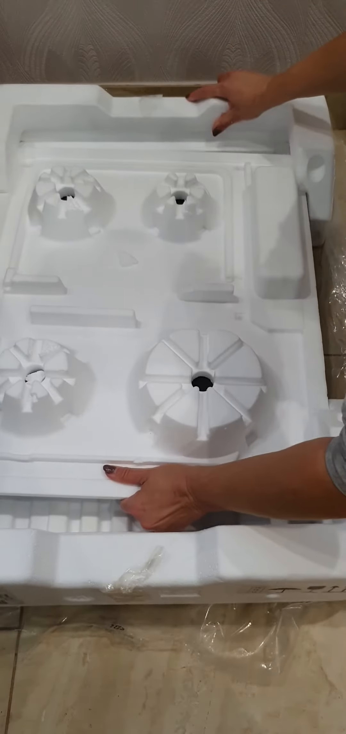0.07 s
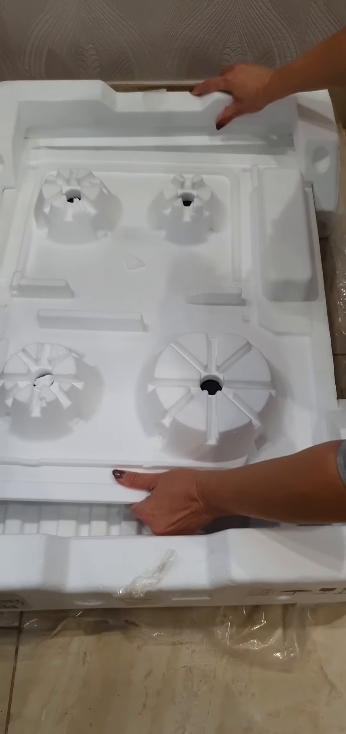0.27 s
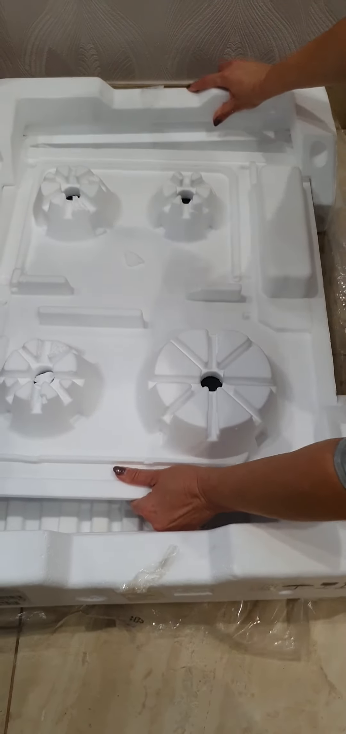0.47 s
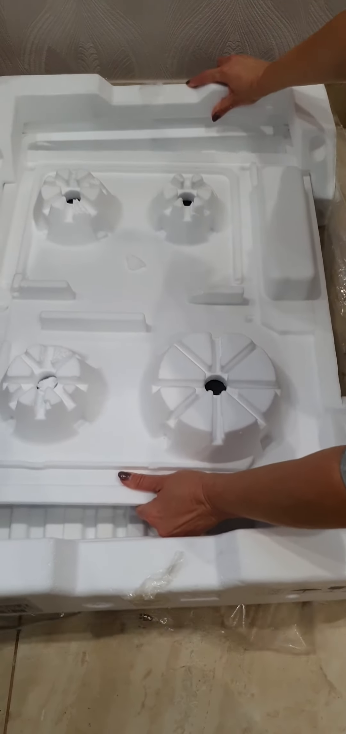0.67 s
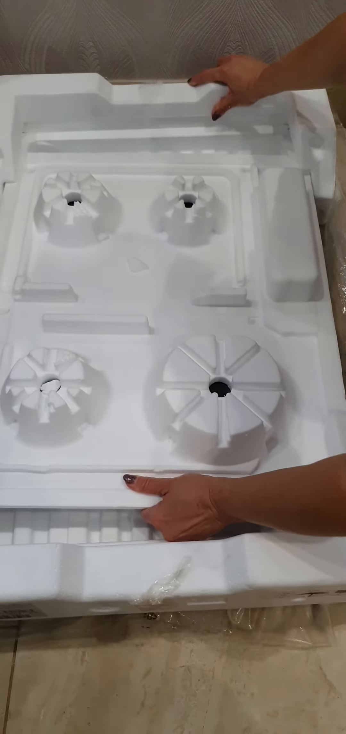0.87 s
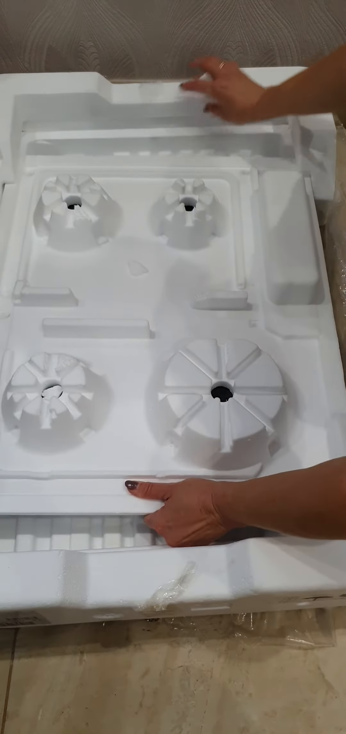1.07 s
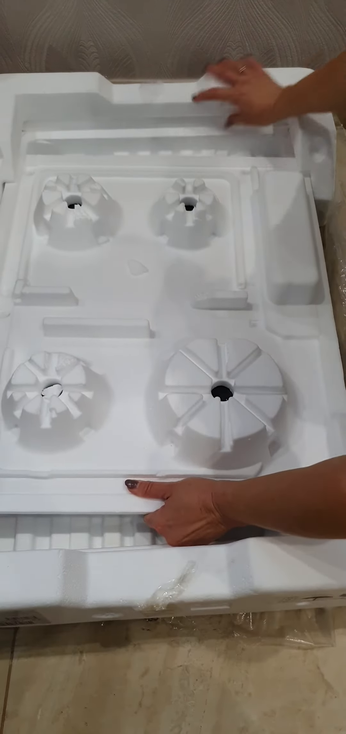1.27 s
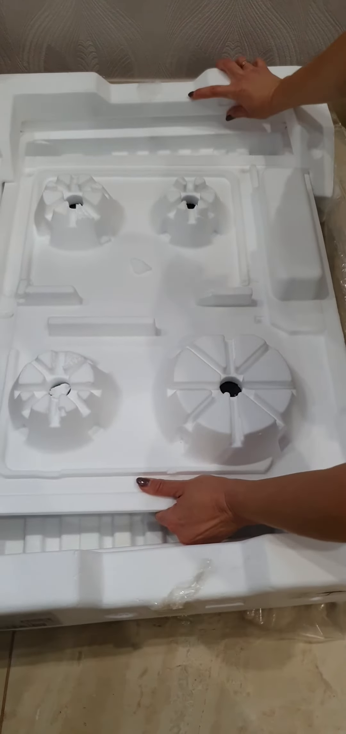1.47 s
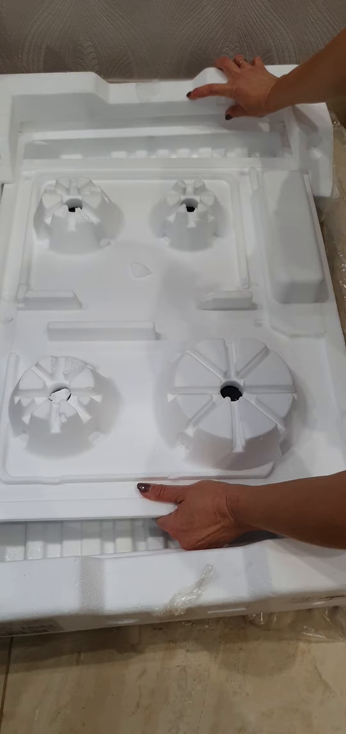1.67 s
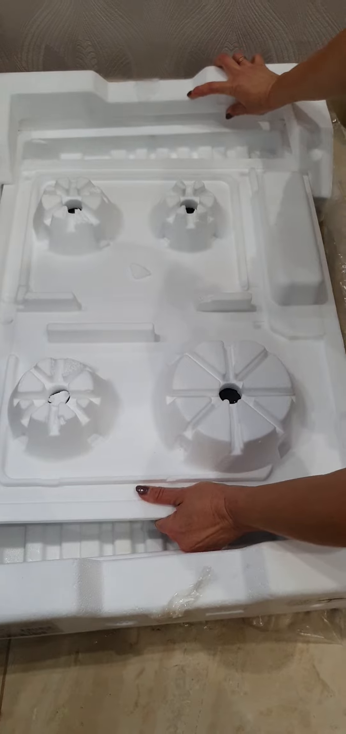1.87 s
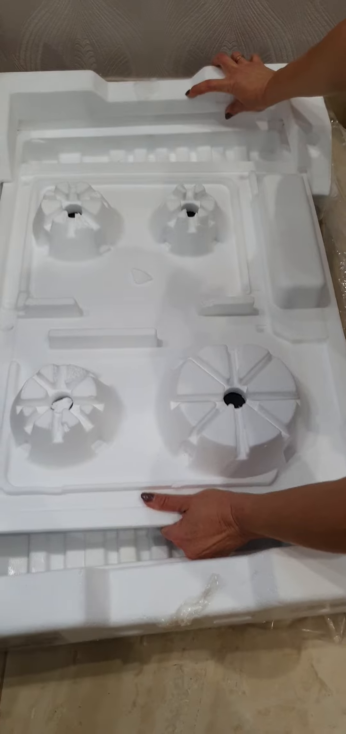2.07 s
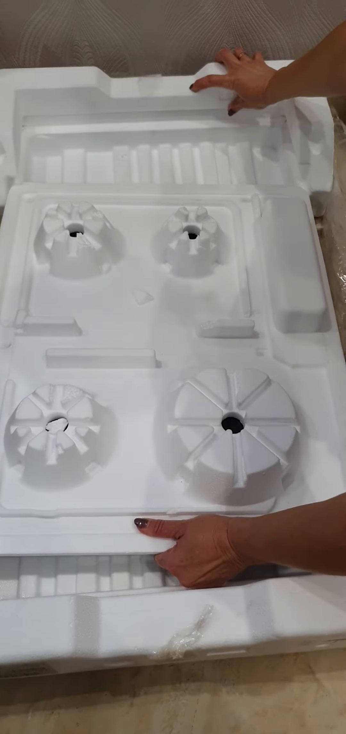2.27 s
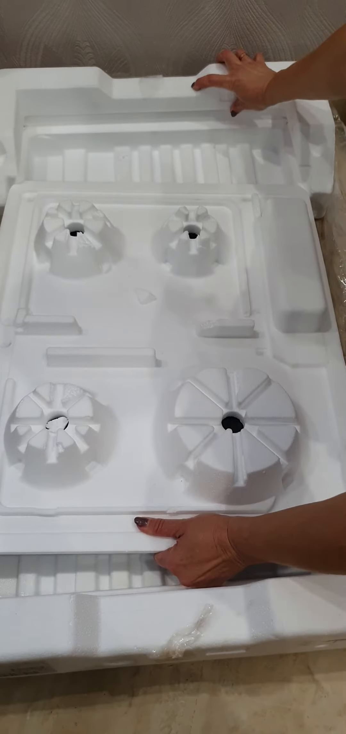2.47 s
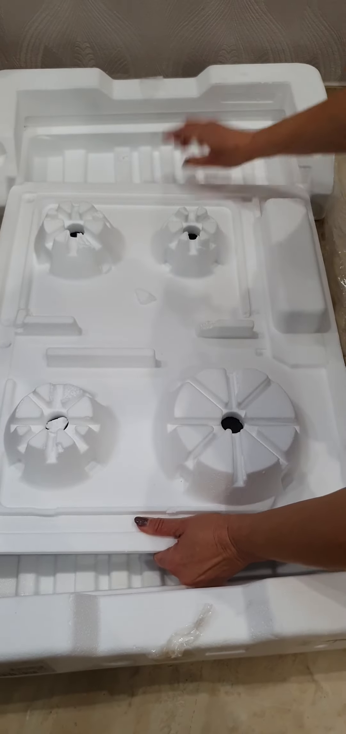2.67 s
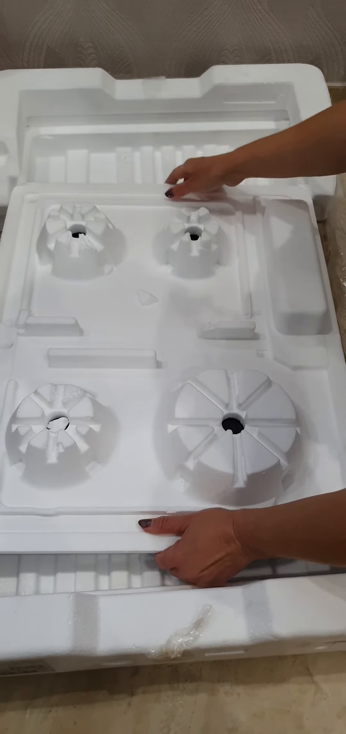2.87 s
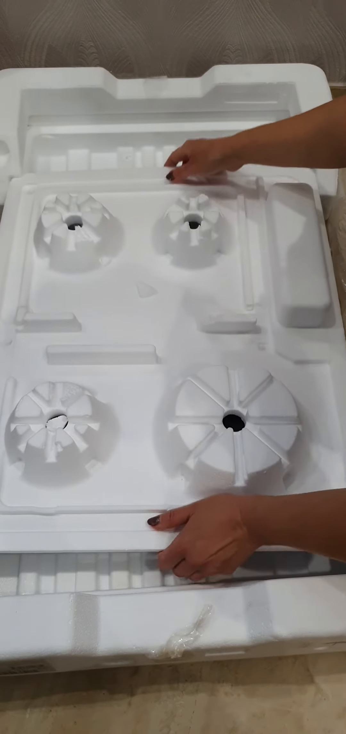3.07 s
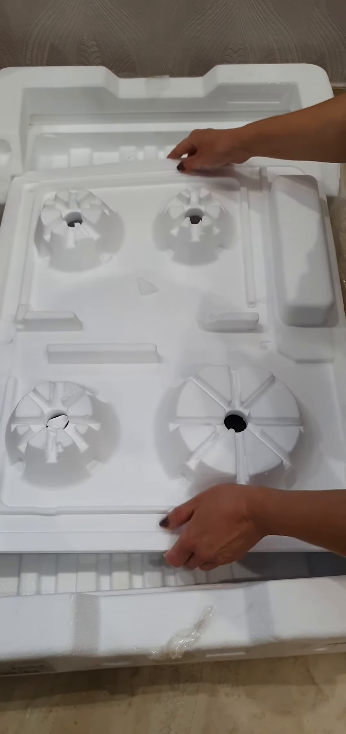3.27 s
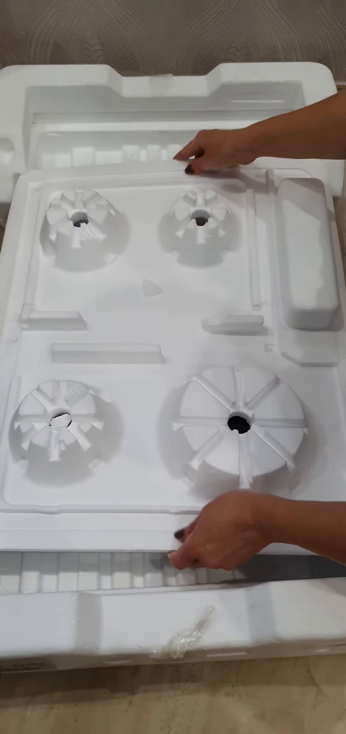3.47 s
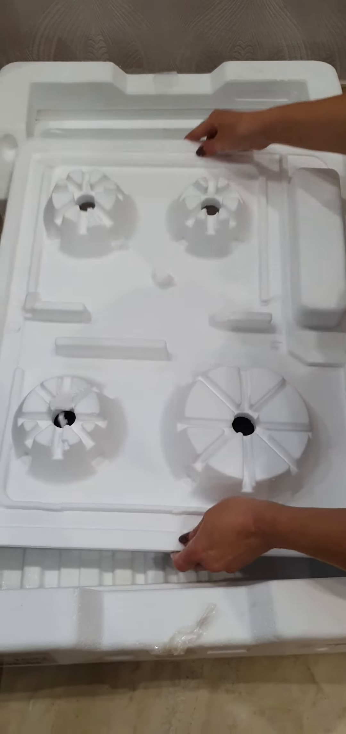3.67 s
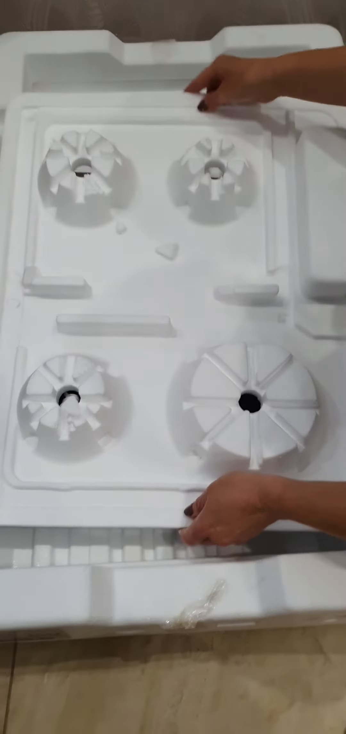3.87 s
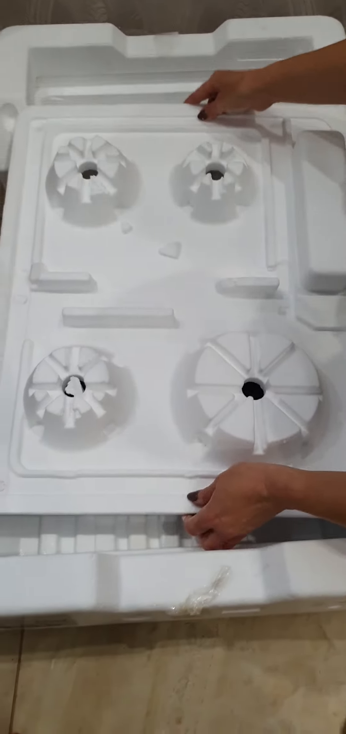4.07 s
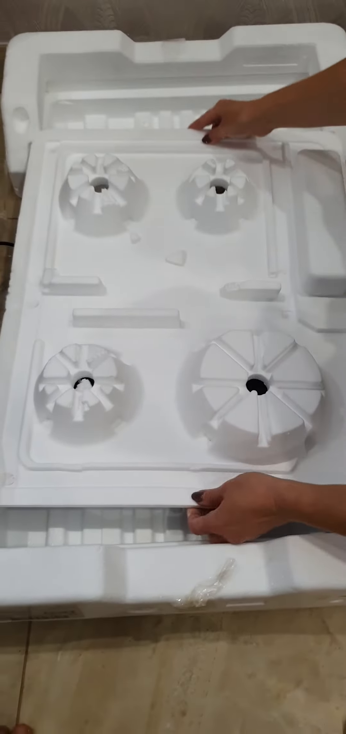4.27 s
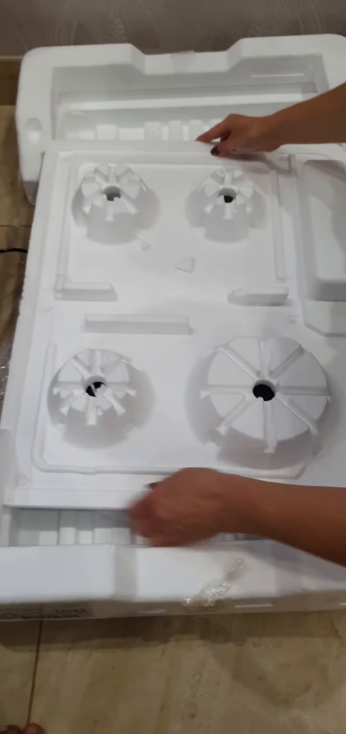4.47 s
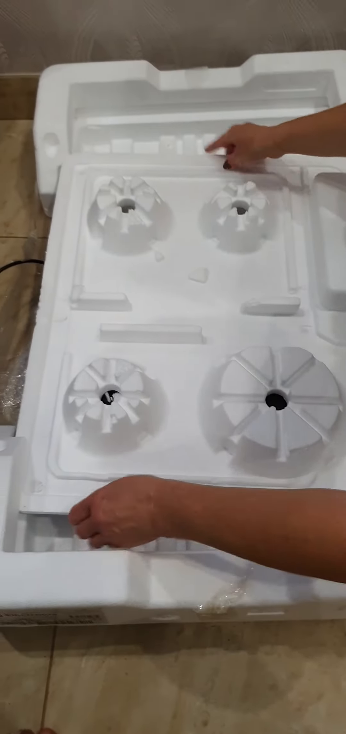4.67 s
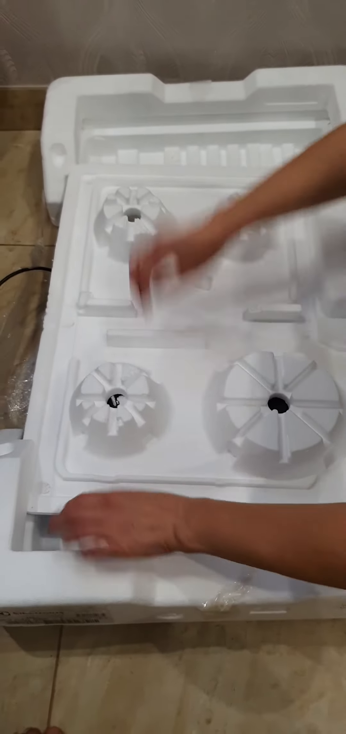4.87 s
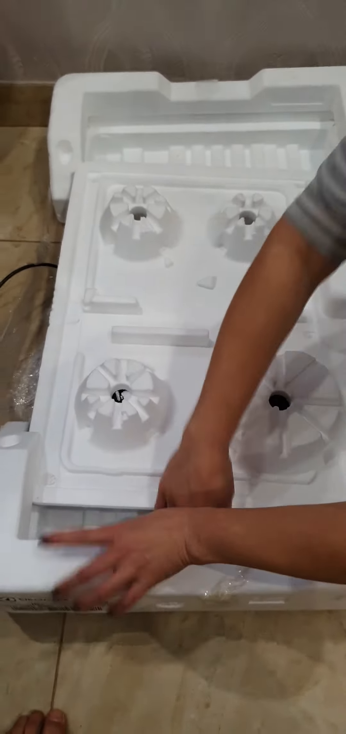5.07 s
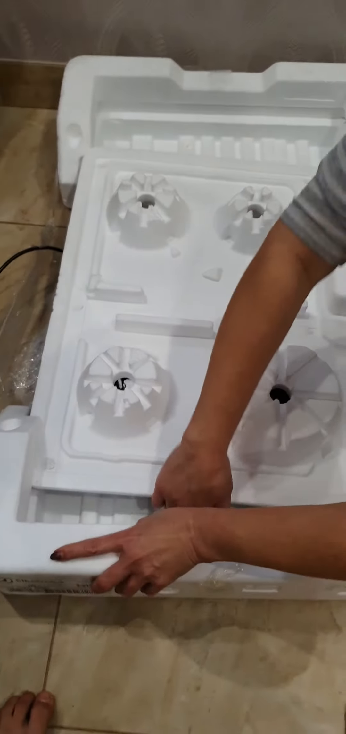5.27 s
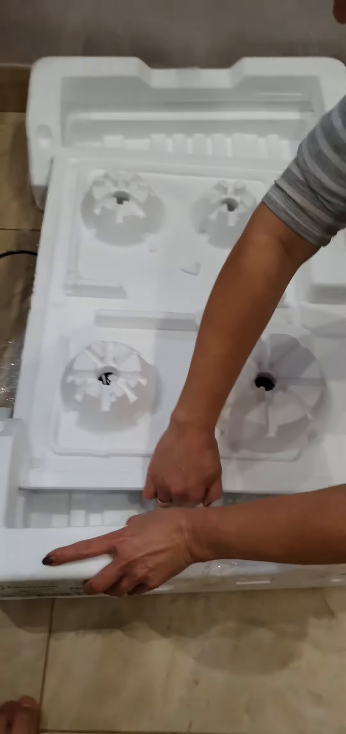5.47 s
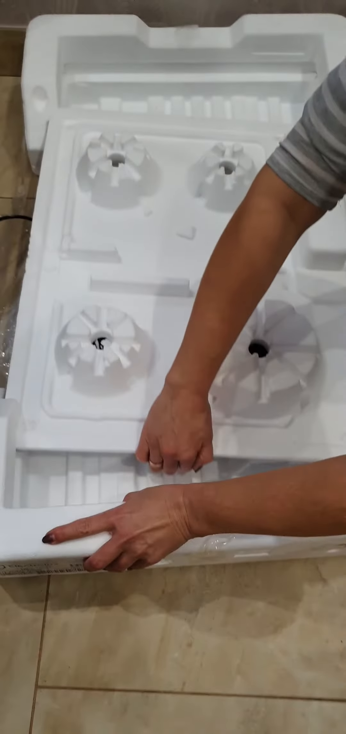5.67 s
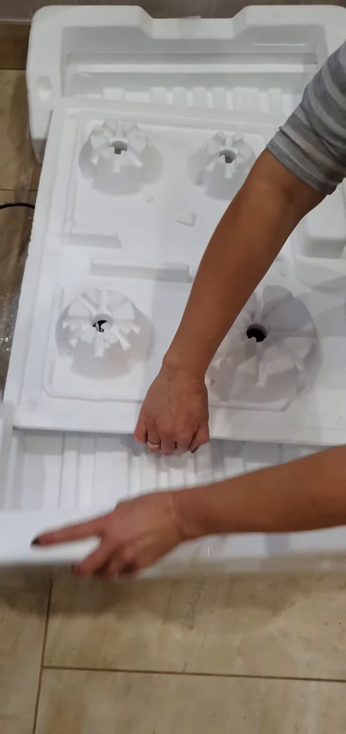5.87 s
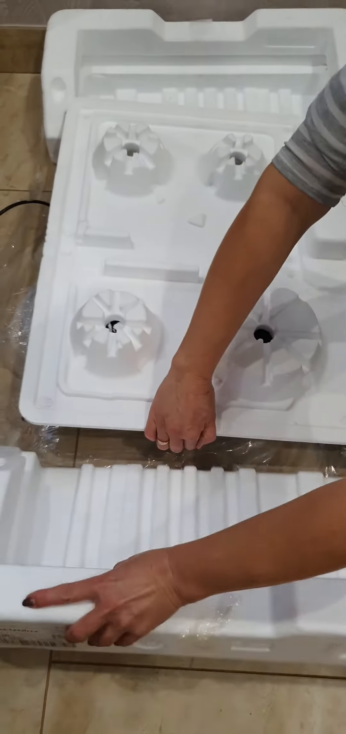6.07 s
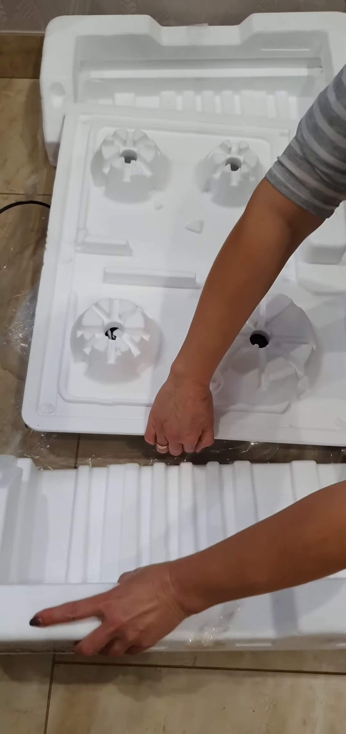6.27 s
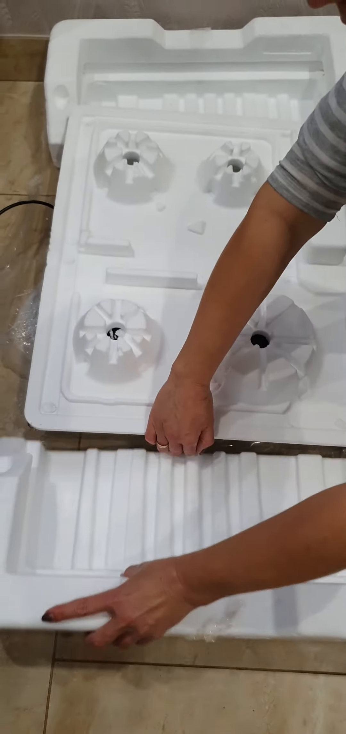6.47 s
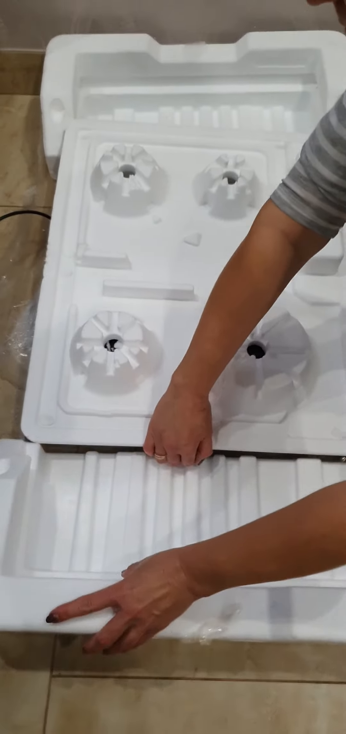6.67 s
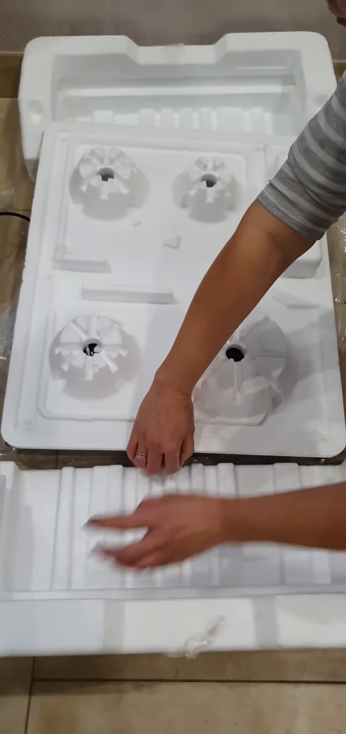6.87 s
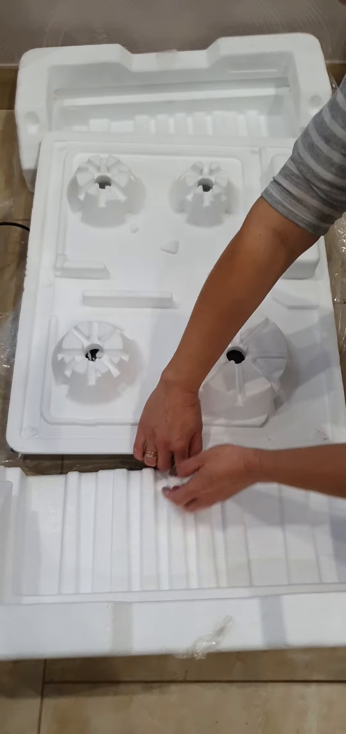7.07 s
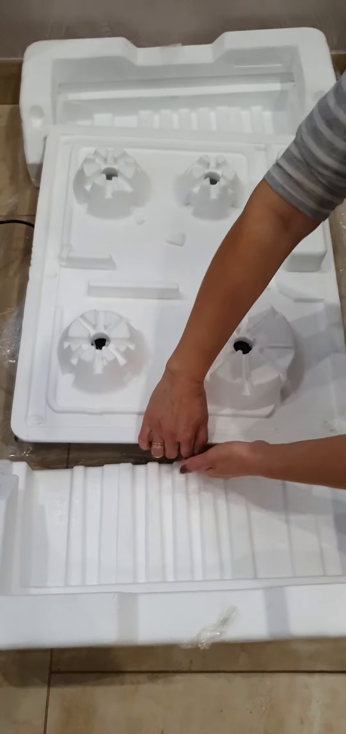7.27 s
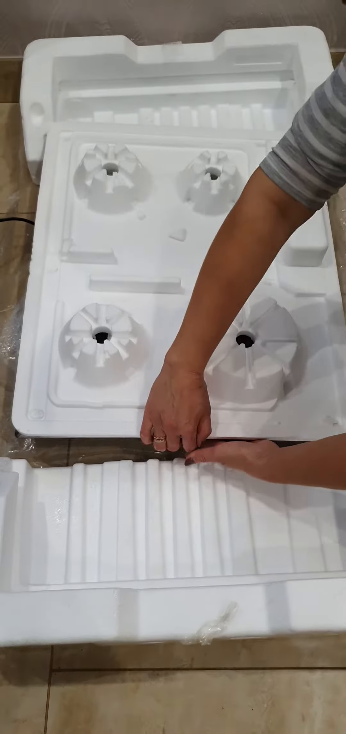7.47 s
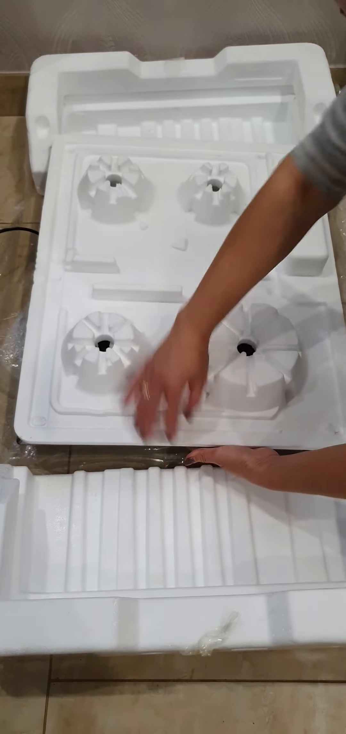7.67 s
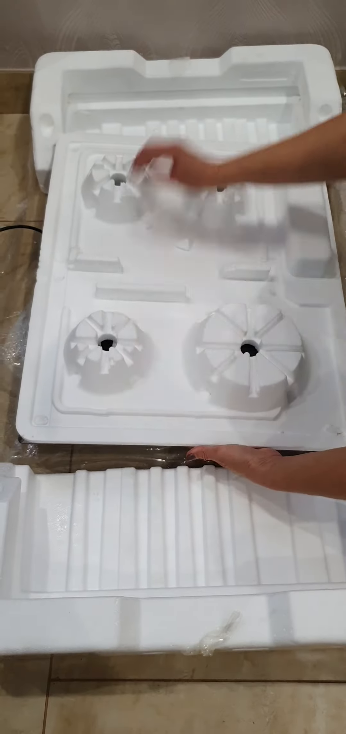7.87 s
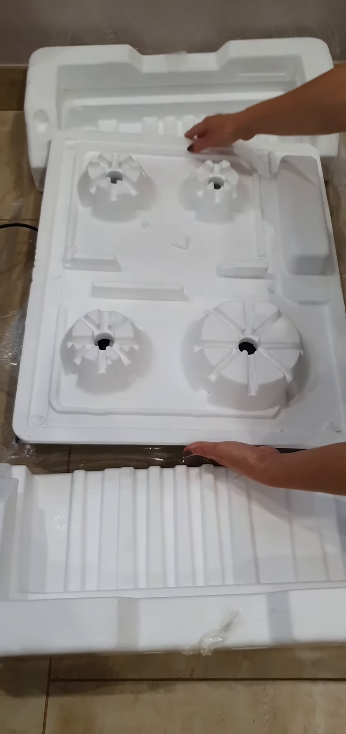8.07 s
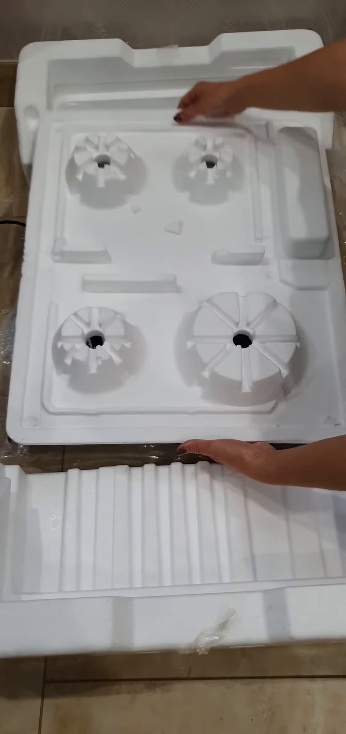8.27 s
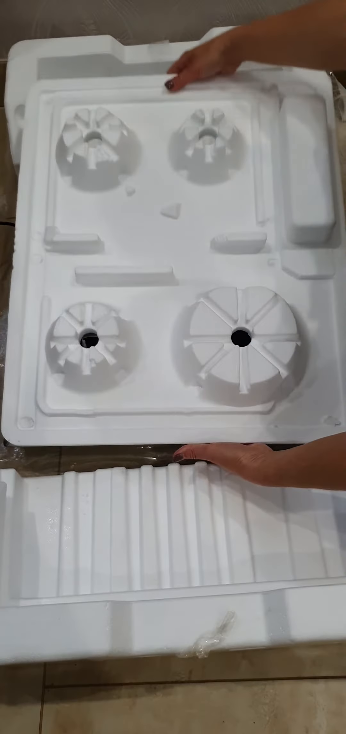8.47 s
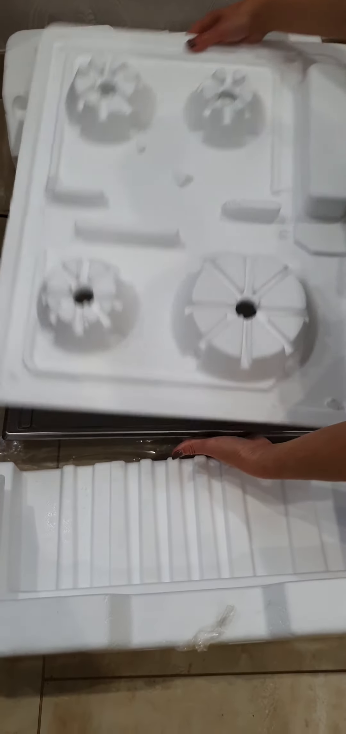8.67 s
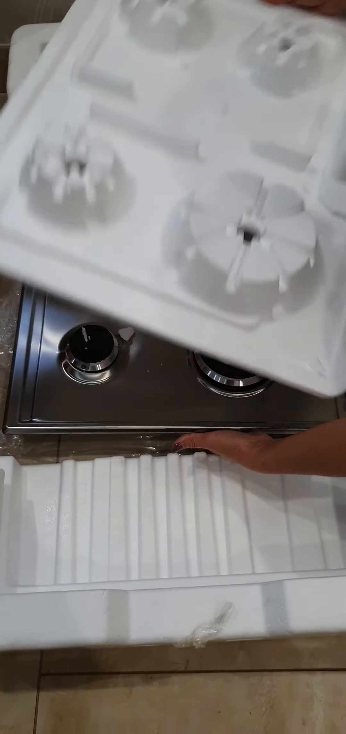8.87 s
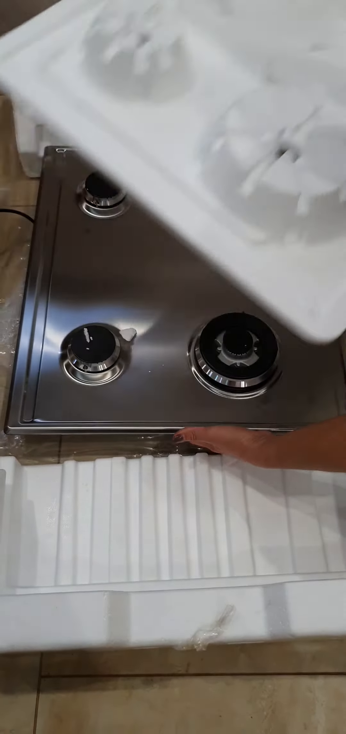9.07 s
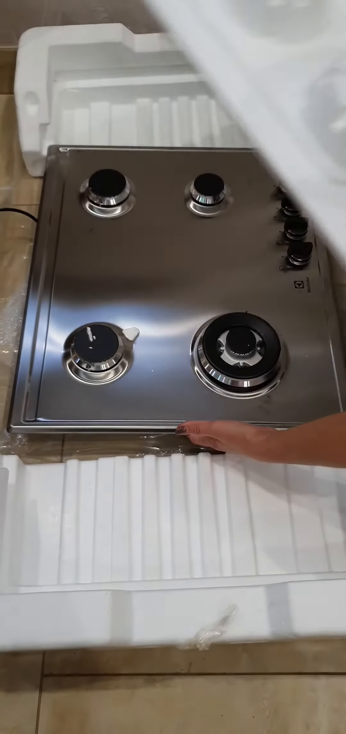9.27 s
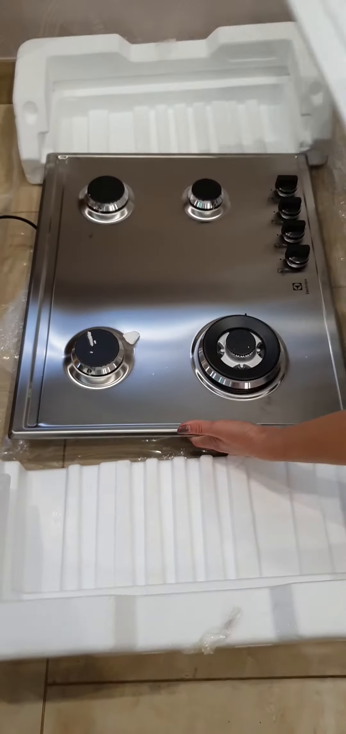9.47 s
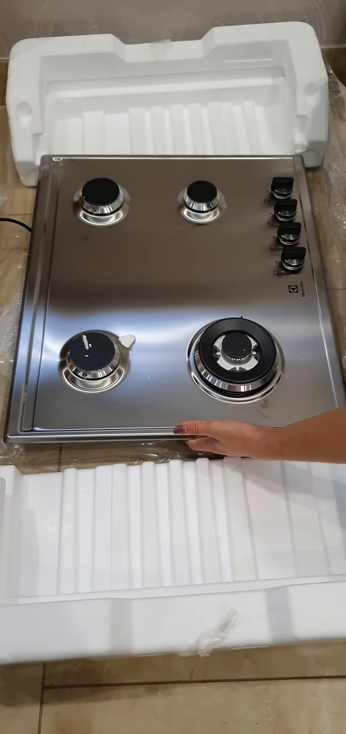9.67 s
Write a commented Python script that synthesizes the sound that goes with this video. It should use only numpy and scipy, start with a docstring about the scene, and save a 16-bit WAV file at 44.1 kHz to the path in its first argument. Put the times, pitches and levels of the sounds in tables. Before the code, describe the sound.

Polystyrene rubs on polystyrene in uneven strokes, hissing and rasping, with dry snaps and hollow thuds. The loudest knocks fall near 2.2 and 5.3 seconds; faint steel ringing comes around 3.1. A bright crack sounds at 6.6, lighter rubs continue, and the lifted tray gives a last knock at 8.4. Close handheld stereo microphone, short bright tiled-room echo, faint hush.

```python
"""A small hard room with a tiled floor: foam packing is worked loose from a steel hob, a phone held above.
Foam beads slip in dense tiny jerks along several contact edges, in strokes that swell, hold and ease off.
Decaying modes give the boom of the slab, later of the lifted tray, the thud of the hob and two steel rings.
Shaped noise makes the snaps of the blows and the cracking beads; wavering tones and rustles are the squeaks.
A dense tail of decaying noise is the room, over a faint hush of wandering level."""
import sys
import numpy as np
from scipy import signal
from scipy.fft import rfft, irfft, next_fast_len
from scipy.io import wavfile
from scipy.ndimage import uniform_filter1d

SR = 44100
rng = np.random.default_rng(int(sys.argv[2]) if len(sys.argv) > 2 else 0)


def unload_audio(sound):
    """Save the sound as a 16-bit wav file, at the path given as the first command line argument."""
    columns = np.transpose(np.atleast_2d(sound))
    # keep every value between -1 and 1, then stretch to whole-number steps
    steps = np.round(np.clip(columns, -1, 1) * 32767)
    wavfile.write(sys.argv[1], SR, steps.astype(np.int16))


N = 428648

# spectrum of the hush, overall level set separately: pitch_hz [Hz], level_db [dB per Hz, relative]
HUSH_SPECTRUM = [(18, -43), (30, -4.5), (87, -4.5), (374, -7.5), (472, -3), (1870, -14), (5170, -15.5),
                 (6200, -15), (15000, -23.5)]
HUSH_DB = -73.5  # rms, ahead of the microphone and the wander of level
# decay of the room in bands: pitch_hz [Hz], t60_s [s], level_db [dB, relative]
ROOM_BANDS = [(97.8, 0.077, -4.5), (313, 0.53, -1), (890, 0.41, 6.5), (2520, 0.46, -0.5), (6150, 0.18, -4),
              (12000, .36, 7)]
# response of both microphone ports: pitch_hz [Hz], level_db [dB]
MIC_RESPONSE = [(20, -41), (45, 11), (100, 6.5), (4000, -1), (5500, 2.5), (6900, 6.5), (7800, -3),
                (11000, -6.5), (15500, -6.5)]
PORTS_APART_M, TOP_HZ = .15, 15850  # port distance; upper limit of the microphone

# modes of the heavy hob rocking on its bed: pitch_hz [Hz], level_db [dB, relative], t60_s [s]
HOB_MODES = [(50.3, -5, 0.39), (74, -0.5, 0.16), (92.97, 5.5, 0.15), (150, -1.5, 0.19)]
# modes of the loose steel part: pitch_hz [Hz], level_db [dB, relative], t60_s [s]
STEEL_MODES = [(2670, -1, 0.14), (4630, -9, 0.3), (5560, -12.5, 0.31), (7540, -4, 0.1093), (8070, 6, 0.21),
               (7850, 3.5, .25), (9421, -20.5, .4), (13290, -5.5, 0.412)]
# modes of the packed foam slab: pitch_hz [Hz], level_db [dB, relative], t60_s [s]
SLAB_MODES = [(131, -9, 0.064), (159.1, -9, .1), (209.5, -6.5, .13), (244, -10, .09), (291.6, -2, .1),
              (364, -8.5, 0.053), (481.2, -2, .1), (620, -8.5, 0.028), (719, -9, .07), (911, -12, 0.052),
              (1106, -17.5, .06), (1350, -13.5, .06)]
# modes of the lifted foam tray: pitch_hz [Hz], level_db [dB, relative], t60_s [s]
TRAY_MODES = [(215, -9.5, 0.097), (307, -7, 0.047), (394, -7.5, 0.17), (488, 0, 0.088), (700, -20, .06),
              (910, -15, 0.035), (1025, 0.5, 0.1), (1086, 2, 0.1), (1800, -23, 0.0502)]
LIFTED_S = 7.9  # from here on the tray rings in place of the slab

# taps on the steel part: start_s [s], level_db [dB, drive of the modes]
STEEL_TAPS = [(3.098, -41.5), (6.57, -55)]
# brief rubs: start_s [s], length_s [s], slip_rate_hz [Hz], level_db [dB, relative],
# unevenness [0-1: low squeaks, high rustles]
SQUEAK_EVENTS = [(2.223, 0.039, 6960, -29.5, 0.052), (3.547, 0.016, 6800, -51, .05),
                 (5.062, 0.039, 2090, -31.5, .04), (8.855, 0.073, 703, -62.5, 0.42),
                 (8.9, 0.063, 5500, -75, 0.27), (9.01, 0.11, 653, -62.5, 0.46),
                 (9.253, 0.025, 1400, -55.5, 0.11), (9.26, 0.077, 902, -66.5, 0.48),
                 (9.342, 0.066, 7000, -71, .05), (9.42, 0.061, 704, -68, 0.41)]
# single beads cracking: start_s [s], level_db [dB, relative], pitch_hz [Hz, centre],
# pan_db [dB, left minus right]
BEAD_CRACKS = [(0.0974, -36, 3050, 3.5), (0.276, -12.5, 6800, 1), (0.597, -14, 3060, 1.5),
               (0.622, -12, 3920, 7.5), (0.9325, -20, 3730, -2.5), (0.956, -21, 6120, 9),
               (1.258, -20.5, 3086, 15), (1.6881, -11, 6100, 9), (2.1127, -11, 3540, 7),
               (2.1354, -13, 3610, -2.5), (2.1565, -7, 3270, 6), (2.703, -46, 3000, -1),
               (2.7661, -43, 3030, 3), (3.5468, -23, 5940, 6), (3.6535, -17.5, 3460, 8),
               (3.8092, -42, 3350, -5), (4.583, -21, 6630, 5), (4.9115, -30, 6810, 3),
               (5.006, -24.5, 6760, -0.5), (5.551, -23, 3230, 2), (6.2136, -17.5, 3280, 2.5),
               (6.266, -23, 3040, 4.5), (6.572, -3.5, 2940, 4.5), (6.8317, -19, 4130, 2.5),
               (8.0094, -31.5, 3090, 0.5), (8.0244, -21.5, 6040, 3), (8.105, -25, 3660, 6),
               (8.4363, -14, 2950, -1), (9.1177, -54, 3630, 0.0)]
# blows: start_s [s], level_db [dB, relative], pitch_hz [Hz, centre of snap],
# boom_db [dB, relative drive of slab and hob against the snap], pan_db [dB, left minus right]
BLOW_EVENTS = [(0.14, -22, 2630, -23, -2), (0.326, -28.5, 2870, -20.5, -3), (1.26, -27, 1052, -13, 5),
               (1.516, -26, 2150, -25.5, -3), (1.692, -26.5, 1030, -17, 2), (2.178, -4.5, 619, -16, 4),
               (2.2, -5, 1330, -17, -0.5), (2.702, -39.5, 1790, -35, -3), (2.77, -38, 2720, -10, 2),
               (2.999, -31, 1117, -14, 2), (3.095, -19, 2490, -31, -0.5), (3.364, -38.5, 940, -20.5, -2.5),
               (3.559, -20.5, 780, -24, 1), (3.591, -20, 1220, -15, -2.5), (3.643, -25.5, 2470, -27, 2.5),
               (4.251, -41, 775, -8, 4), (4.571, -39, 1250, -11, 2), (4.691, -29, 1270, -16.5, 3),
               (4.908, -34.5, 700, -8.5, -6), (5.039, -19.5, 634, -6.5, -2), (5.326, -7, 641, -17, 2),
               (6.159, -21, 584, -17, -0.5), (6.521, -33.5, 632, -5.5, 4.5), (6.571, -18.5, 2800, -12, -2),
               (7.09, -27, 648, -11, 3.5), (8.012, -40, 2270, -28, 5.5), (8.025, -34, 1380, -31, -0.5),
               (8.224, -27, 985, -25.5, 9), (8.438, -16.5, 1526, -22.5, 5.5), (8.448, -16, 1088, -18, 1.5),
               (9.631, -62, 719, -18, -5.5)]
# decay time constant; width at 1 kHz; brighter snaps are narrower
SNAP_DECAY_S, SNAP_WIDTH_OCT, NARROWING_OCT_PER_OCT = 0.0051, 1.91, 0.33

# strokes of sliding foam: start_s [s], swell_s [s], hold_s [s], scrape_db [dB, relative], then relative
# drives against the scrape: hiss_db [dB, fine hiss], boom_db [dB, slab], thud_db [dB, hob]
STROKE_EVENTS = [(0, 0.0033, 0.11, -33.5, -1.5, -3.5, -16.5), (0.139, 0.013, 0.14, -31, -1.5, -8.5, -21.5),
                 (0.313, 0.028, .14, -31, -2.5, -11, -22.5), (0.529, 0.11, 0.057, -27.5, -2, -6.5, -19.5),
                 (0.799, 0.091, 0.14, -39, -1, 0, -25), (1.119, 0.062, 0.11, -49.5, 5, 4.5, -10),
                 (1.251, .015, 0.16, -35.5, -0.5, -6.5, -12), (1.382, 0.038, 0.2, -38.5, -2.5, -0.5, -18.5),
                 (1.657, 0.034, .04, -32, -3, -8.5, -9.5), (1.785, 0.045, 0.34, -40, -2.5, -0.5, -10),
                 (1.999, 0.11, .03, -30, 1, -4, -20), (2.132, 0.022, .025, -20.5, 0.5, 6.5, -24.5),
                 (2.184, .03, 0.088, -23, -6.5, 9, -23), (2.306, 0.025, 0.15, -44.5, -5.5, 8, -4.5),
                 (2.747, 0.024, .15, -51, -2.5, -5, -6.5), (2.9, 0.038, 0.17, -50.5, -3.5, -6, -10.5),
                 (3.09, .01, 0.042, -41.5, -2.5, 6.5, -26), (3.153, .02, 0.13, -50, -4, -2.5, -27),
                 (3.346, 0.13, 0.079, -46.5, -2, -2.5, -22), (3.538, 0.0089, 0.01, -35.5, 4, -6, -12.5),
                 (3.611, .02, 0.055, -49.5, 3, 7, 0.5), (3.716, .03, 0.18, -48, -5, 1.5, -14),
                 (3.952, 0.043, 0.089, -50, 0.5, 10.5, -5), (4.132, 0.033, 0.14, -50, -3, 1, -14),
                 (4.256, 0.15, 0.046, -35.5, 1, -4.5, -13.5), (4.561, 0.065, 0.02, -36, 3.5, -8, -16),
                 (4.694, 0.057, 0.032, -43, 1, 2.5, -6.5), (4.894, 0.032, 0.1, -51, 1.5, 9.5, 0),
                 (5.051, .03, 0.038, -36, -1, 10.5, 3), (5.13, 0.037, 0.13, -40.5, 2.5, 9, 4),
                 (5.319, .01, 0.0495, -39, -14, 27, -16), (5.378, 0.048, 0.144, -38.5, -2, -3.5, -4.5),
                 (5.522, 0.075, 0.066, -30.5, -0.5, -10.5, -12.5),
                 (5.702, 0.12, 0.073, -30, 0.5, -4.5, -20.5), (5.857, .01, .02, -32.5, 4, 2, -21.5),
                 (5.915, 0.023, 0.026, -33.5, -1.5, 8.5, -9), (6.004, .02, 0.14, -44, -1, -10, -6.5),
                 (6.15, .01, 0.015, -42.5, 2, 18, 12.5), (6.217, 0.035, .05, -40, -4.5, 14.5, -0.5),
                 (6.356, 0.02, .15, -41.5, -0.5, 0, -8.5), (6.561, .01, 0.014, -26.5, -11, -3, -18),
                 (6.654, 0.076, 0.094, -39, 1.5, 3, -13.5), (6.83, .03, 0.29, -40.5, -7, -7.5, -17.5),
                 (7.057, 0.018, .03, -37.5, -1.5, 3.5, -12.5), (7.148, .05, 0.045, -45, 5, 7, -10),
                 (7.234, .04, 0.056, -43, 2, 12.5, 10), (7.316, 0.027, 0.056, -39, -2, 12.5, 1),
                 (7.481, 0.044, 0.064, -38.5, 0, -5, -11), (7.703, 0.06, 0.58, -68, -12, 3, -4.5),
                 (8.003, 0.021, 0.024, -42, -1.5, 0, -11), (8.092, 0.016, 0.028, -36, -3.5, -14, -14),
                 (8.175, .04, 0.028, -37.5, -0.5, 1, -14.5), (8.262, 0.051, 0.15, -39, -1.5, -8, -13),
                 (8.434, .015, 0.032, -35.5, -3, 2, -12), (8.864, 0.035, 0.063, -79.5, 7, 13, 4),
                 (9.01, .06, .06, -71, -4, 7, -1), (9.21, .04, 0.068, -68.5, -3, -2, -15),
                 (9.353, 0.04, .1, -82.5, 9, 0, 0), (9.618, .02, 0.073, -79, -5, 5, 7)]
# how fast a stroke eases off: scrape, hiss, rasp, boom, thud [dB per s each]
EASE_RATES = 171, 236, 171, 300, 200
# lag by which each contact edge reaches the left port later, negative is earlier: lag [samples]
CONTACT_LAGS = (-15, -13, -9, -6, -4, 1, 3, 8)
# a boomier stroke also rasps more, up to this much boom
RASP_DB, RASP_PER_BOOM, RASP_FULL_DB = 0.03, 0.54, 12.5


def undb(db):
    """Decibels to gain."""
    return 10 ** (np.asarray(db) / 20)


def unit(x):
    """Scale to rms 1."""
    return x / np.sqrt(np.mean(x ** 2))


def port_gains(level_db, pan_db):
    """Gains at the left and right ports, split evenly about the level."""
    return undb(level_db + np.array([[pan_db], [-pan_db]]) / 2)


def band(x, lo_hz, hi_hz, order=2):
    """Band-pass along time."""
    edges = [lo_hz, min(hi_hz, .45 * SR)]
    return signal.sosfilt(signal.butter(order, edges, "band", fs=SR, output="sos"), x)


def colour(x, points):
    """Weigh a sound by (Hz, dB) points, joined on a log frequency scale."""
    hz, db = np.transpose(points)
    size = next_fast_len(x.shape[-1])
    f = np.fft.rfftfreq(size, 1 / SR) + 1  # the offset avoids log(0)
    gain = undb(np.interp(np.log(f), np.log(hz), db))
    return irfft(rfft(x, size) * gain, size)[..., :x.shape[-1]]


def walk(rate):
    """Random levels drawn at this rate per second, joined by straight slews."""
    hold = int(SR / rate)
    return uniform_filter1d(np.repeat(rng.standard_normal(N // 20), hold)[:N], hold)


def diffuse(count):
    """Noise from all sides at two ports: alike in the bass, nearly unrelated in the treble."""
    a, b = rfft(rng.standard_normal((2, count)))
    # 343 m/s is the speed of sound
    alike = .94 * np.sinc(2 * np.fft.rfftfreq(count, 1 / SR) * PORTS_APART_M / 343)
    mid = a * np.sqrt((1 + alike) / 2)
    side = b * np.sqrt((1 - alike) / 2)
    return irfft(np.array([mid + side, mid - side]), count)


def ring(x, modes):
    """Drive a set of exponentially decaying modes; neighbours swing in opposite senses."""
    total = 0
    for k, (hz, db, t60) in enumerate(modes):
        pole = np.exp(2j * np.pi * hz / SR - np.log(1000) / (t60 * SR))
        total = total + (-1) ** k * undb(db) * signal.lfilter([1], [1, -pole], x).imag
    return total


def hush():
    """Faint diffuse background noise whose level wanders."""
    return unit(colour(diffuse(N), HUSH_SPECTRUM)) * undb(HUSH_DB + 1.5 * walk(11.0))


def room(dry, wet_db):
    """Dense echoes from tiles and walls, each band dying at its own pace."""
    t, tail = np.arange(32768) / SR, 0
    noise = diffuse(len(t))
    for hz, t60, db in ROOM_BANDS:
        tail = tail + band(noise, hz / 2, hz * 2, order=1) * undb(db - 60 * t / t60)
    tail = tail * (1 - np.exp(-(t / 0.00081) ** 2))  # echoes build up within about a millisecond
    tail = tail / np.sqrt(np.sum(tail ** 2) / 2)
    source = dry.mean(axis=0, keepdims=True)
    return dry + undb(wet_db) * signal.fftconvolve(source, tail, axes=1)[:, :N]


def hob(drive):
    """The heavy hob rocks on its bed in a few low modes."""
    return ring(drive, HOB_MODES)


def steel_part():
    """Single-sample taps set the modes of the loose steel part ringing."""
    taps = np.zeros((2, N))
    for s, db in STEEL_TAPS:
        taps[:, int(s * SR)] = undb(db)
    return ring(taps, STEEL_MODES)


def foam_body(drive):
    """The modes of the packed slab ring first, those of the lifted tray later."""
    out, lifted = np.zeros_like(drive), int(LIFTED_S * SR)
    out[:, :lifted] = ring(drive[:, :lifted], SLAB_MODES)
    out[:, lifted:] = ring(drive[:, lifted:], TRAY_MODES)
    return out


def squeaks():
    """Brief stick-slip that swells and dies; the slip rate and size waver."""
    out, waver = np.zeros((2, N)), walk(600)
    for s, length, hz, db, uneven in SQUEAK_EVENTS:
        i, count = int(s * SR), int(length * SR)
        rate = hz * (1 + uneven * waver[i:i + count])
        phase = 2 * np.pi * np.cumsum(rate) / SR
        size = undb(db + 5.3 * uneven * waver[:count])
        out[:, i:i + count] += size * np.hanning(count) ** .5 * np.sin(phase)
    return out


def cracks():
    """A cracking bead is a dry band of noise with a decay of about a millisecond."""
    t = np.arange(256) / SR
    out = np.zeros((2, N + len(t)))
    bursts = rng.standard_normal((len(BEAD_CRACKS), len(t)))
    for (s, db, hz, pan_db), noise in zip(BEAD_CRACKS, bursts):
        i = int(s * SR)
        tick = band(noise * np.exp(-t / .0013), hz / 1.6, hz * 1.6)
        out[:, i:i + len(t)] += port_gains(db, pan_db) * 0.37 * tick / np.abs(tick).max()
    return out[:, :N]


def blows():
    """Each blow is a short ragged snap that also pushes foam and hob."""
    t = np.arange(4096) / SR
    snaps, pushes = np.zeros((2, 2, N + len(t)))
    bursts = rng.standard_normal((len(BLOW_EVENTS), len(t)))
    for (s, db, hz, boom_db, pan_db), noise in zip(BLOW_EVENTS, bursts):
        i, gains = int(s * SR), port_gains(db, pan_db)
        # a duller blow is a longer, softer contact: half a cycle of its centre pitch,
        # after one cycle in which the foam is squeezed
        contact = np.sin(np.pi * np.clip(2 * (hz * t - 1), 0, 1)) ** 2
        contact /= contact.sum()
        ragged = noise * np.exp(-t / SNAP_DECAY_S)
        crack = 1.5 * contact * SR / hz / 8 + ragged * np.minimum(hz * t / 2, 1)
        octaves = SNAP_WIDTH_OCT - NARROWING_OCT_PER_OCT * np.log2(hz / 1e3)
        reach = 2 ** (octaves / 2)
        snap = band(crack, hz / reach, hz * reach)
        snap += undb(-24.5) * band(crack, hz * 2, hz * 3.3)  # crunch of the skin
        snaps[:, i:i + len(t)] += gains * 0.95 * snap / np.abs(snap).max()
        pushes[:, i:i + len(t)] += gains * undb(boom_db + 3.) * (contact + .015 * ragged)
    boom = band(foam_body(pushes), 170, 2200)
    return (snaps + boom + undb(-19.5) * hob(pushes))[:, :N]


def slips(scatter_db, jerk_db, jerk_rate):
    """Tiny slips of uneven size along each contact edge; the whole slab grips and lets go in jerks."""
    out = np.zeros((2, N))
    for lag in CONTACT_LAGS:
        size_db = scatter_db * rng.exponential(size=N) + jerk_db * walk(3 * jerk_rate)
        edge = rng.standard_normal(N) * undb(size_db)
        out += [np.roll(edge, lag), edge]
    return unit(out * undb(jerk_db * walk(jerk_rate)))


def stroke_levels():
    """Gains of scrape, hiss, rasp, boom and thud: each stroke swells, holds and eases off; powers add."""
    t = np.arange(SR // 2) / SR  # a stroke sounds for half a second at most
    power = np.zeros((5, N + SR))
    for s, swell, hold, db, hiss_db, boom_db, thud_db in STROKE_EVENTS:
        rasp_db = RASP_DB + RASP_PER_BOOM * min(boom_db, RASP_FULL_DB)
        top_db = db + np.array([0, hiss_db, rasp_db, boom_db, thud_db])
        ease_db = np.outer(EASE_RATES, np.maximum(t - swell - hold, 0))
        rise = np.sin(np.pi / 2 * np.minimum(t / max(swell, .002), 1)) ** 2
        gain = rise * undb(top_db[:, None] - ease_db)
        power[:, int(max(s, 0) * SR):][:, :len(t)] += gain ** 2
    return np.sqrt(power[:, :N])


def rubbing():
    """Foam on foam, steel and tile: scrape, rasp and hiss of the beads, boom of the foam, thud of the hob."""
    scrape, hiss, rasp, boom, thud = stroke_levels()
    beads = slips(scatter_db=2.3, jerk_db=2., jerk_rate=35)
    lumps = slips(scatter_db=2., jerk_db=2., jerk_rate=30)
    scraping = scrape * unit(band(beads, 1900, 4300))
    hissing = hiss * unit(band(beads, 7100, 14000))
    rasping = rasp * unit(band(lumps, 490, 2500))
    # the modes ring on after the drive stops, so the drive is shaped before them
    booming = band(foam_body(lumps * boom * undb(-34.0)), 120, 2200)
    thudding = hob(diffuse(N) * thud * undb(-40.5))
    return undb(-1.5) * (scraping + hissing + rasping + booming + thudding)


def scene():
    """Rubbing and blows in the room, over its hush; the blows excite more room."""
    struck = room(blows() + steel_part(), wet_db=3.0)
    rubbed = room(rubbing() + squeaks() + cracks(), wet_db=-5.0)
    return hush() + struck + rubbed


def record(dry):
    """The ports lift the region near 7 kHz, the left one hears more treble; the top is cut."""
    heard = colour(dry, MIC_RESPONSE)
    left_points = [(300, 0.15), (2000, 1.1), (4000, 1.3), (8000, 2.7), (12000, 2.9)]  # (Hz, dB)
    heard[0] = colour(heard[0], left_points)
    top_cut = signal.ellip(12, .2, 80, TOP_HZ, fs=SR, output="sos")
    return signal.sosfilt(top_cut, np.clip(heard, -.9, .9))


dry = scene()
out = record(dry)
unload_audio(out)
```